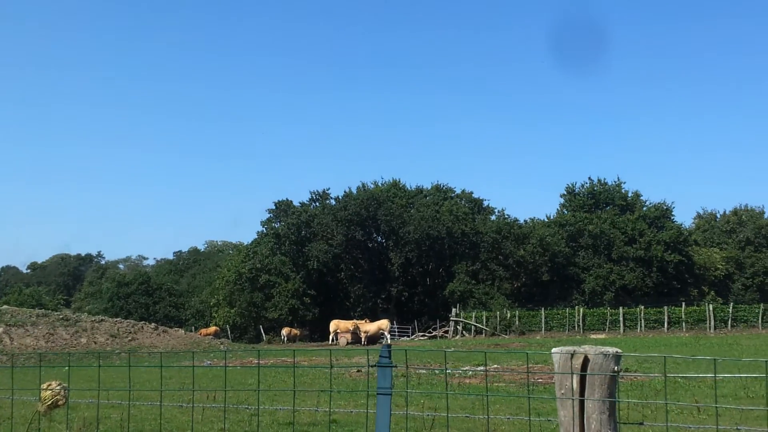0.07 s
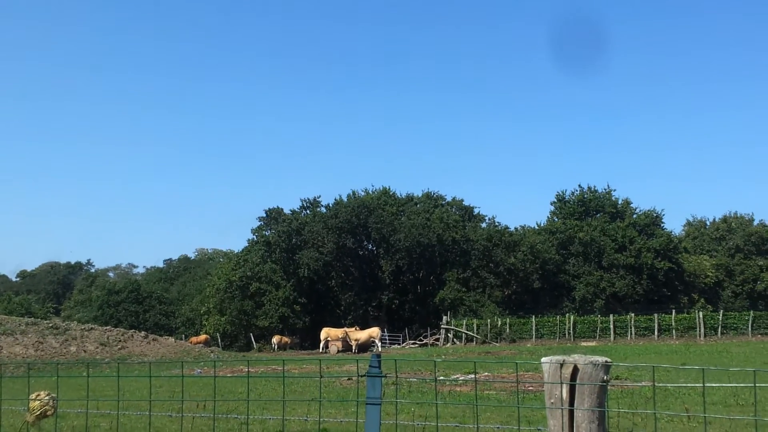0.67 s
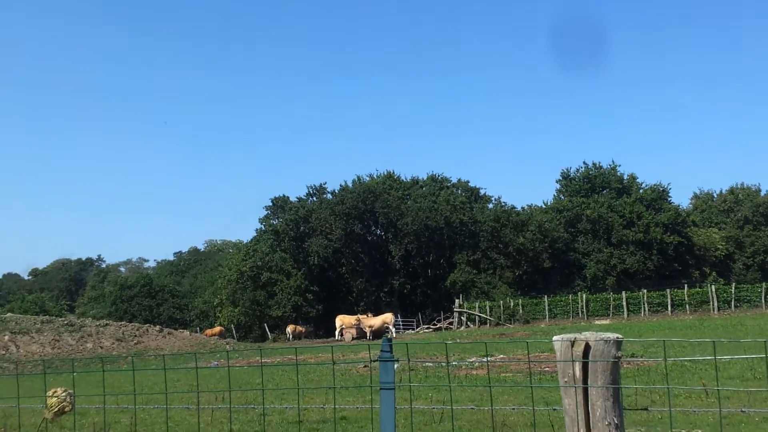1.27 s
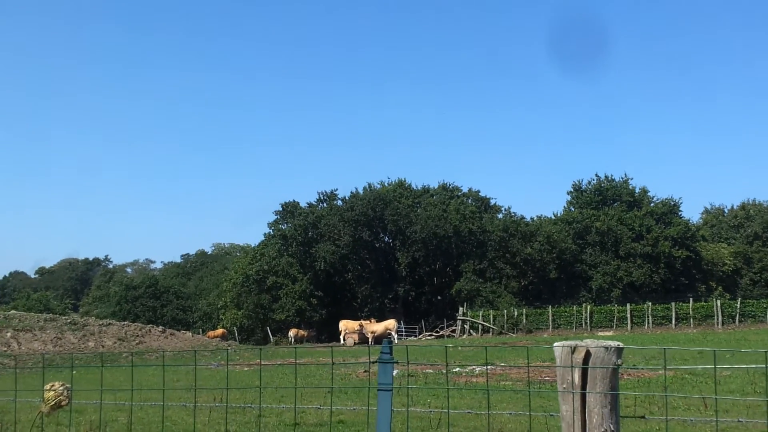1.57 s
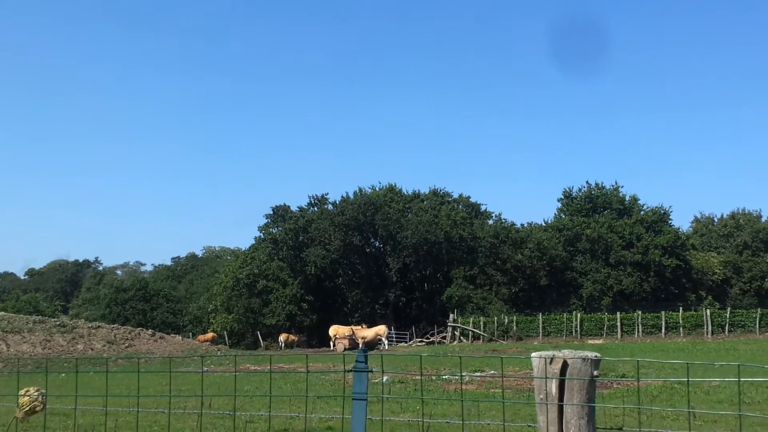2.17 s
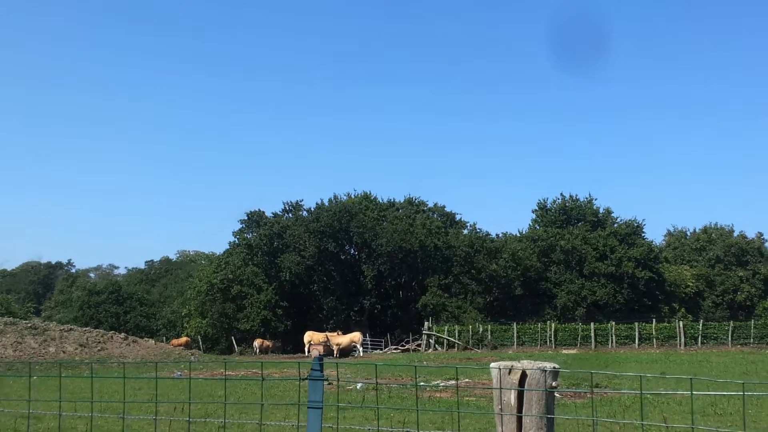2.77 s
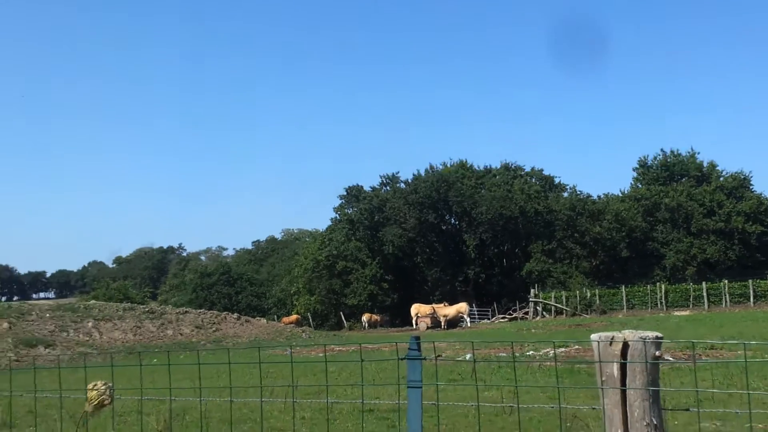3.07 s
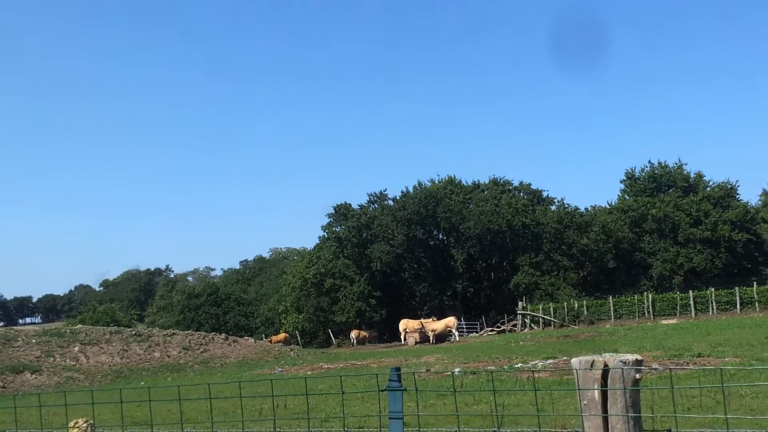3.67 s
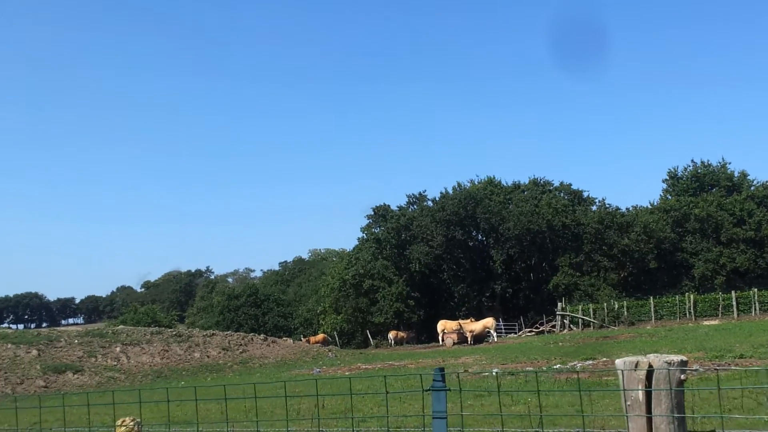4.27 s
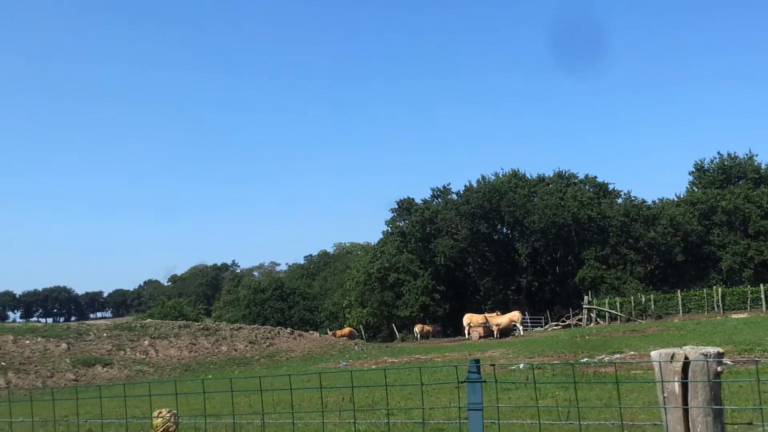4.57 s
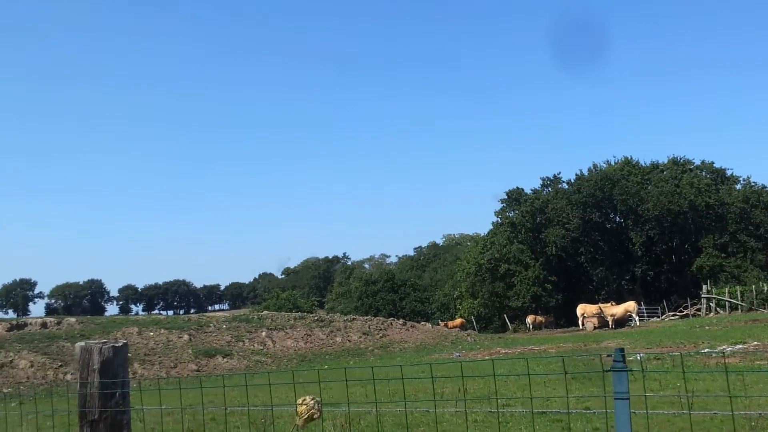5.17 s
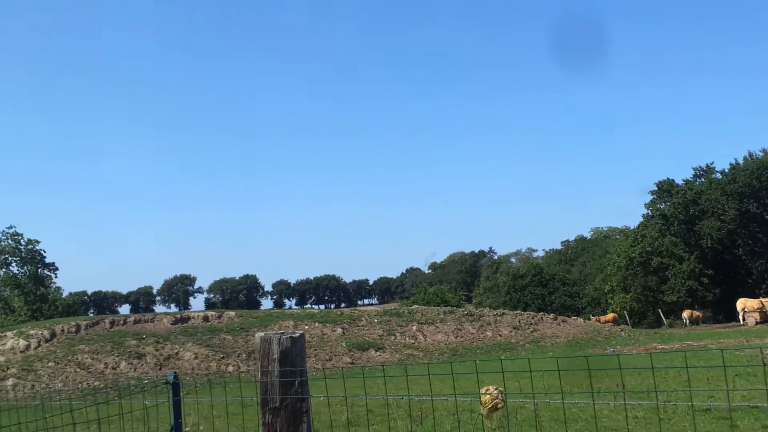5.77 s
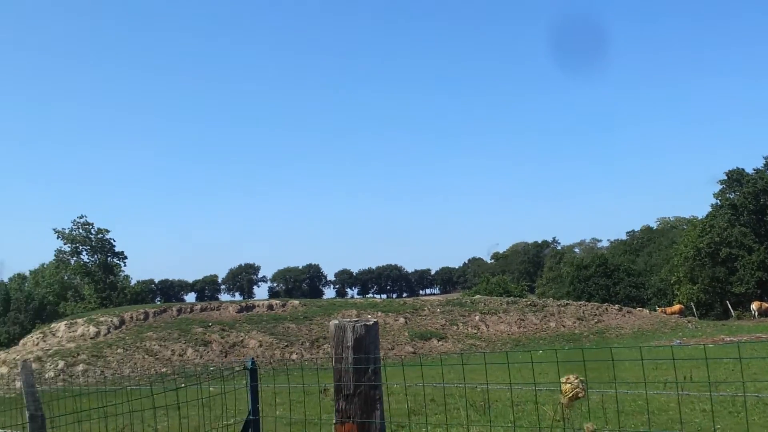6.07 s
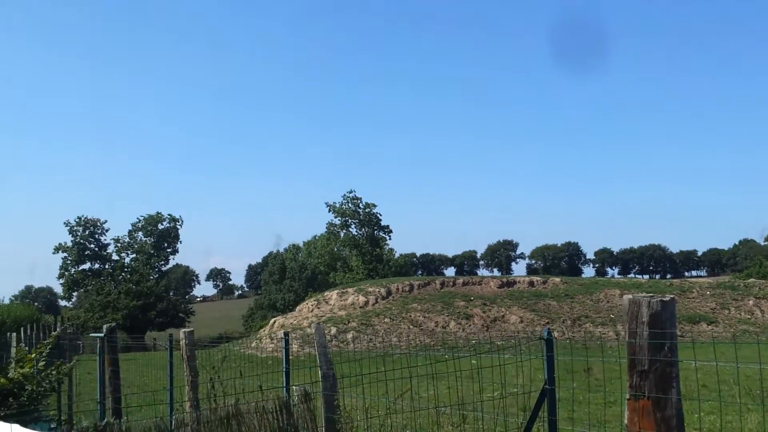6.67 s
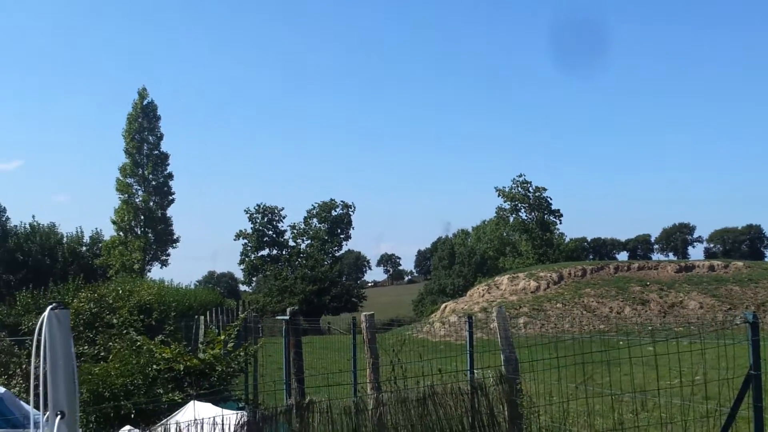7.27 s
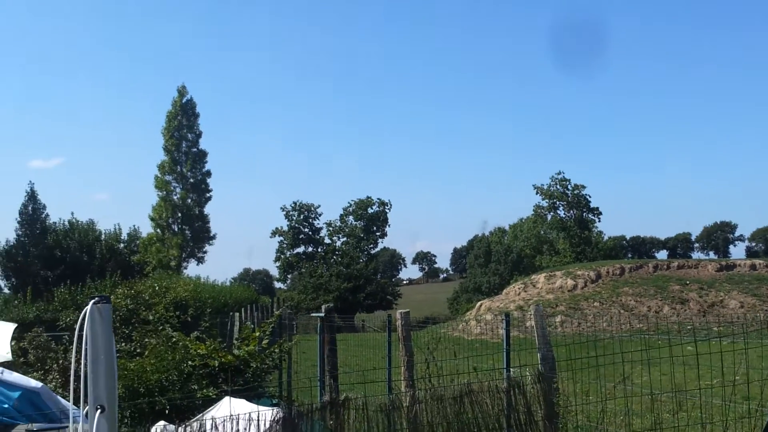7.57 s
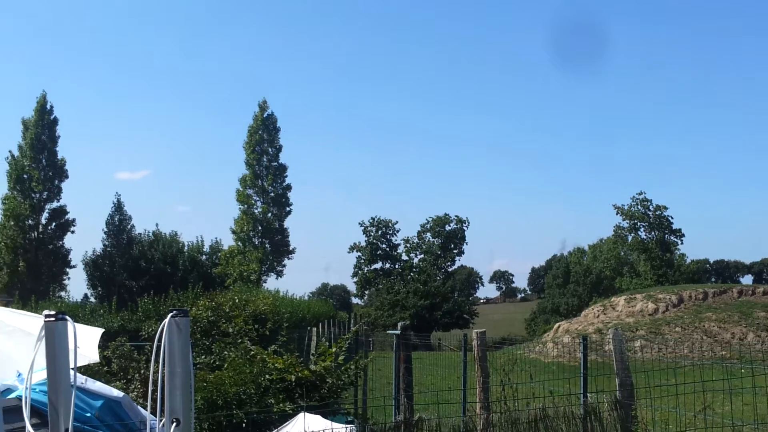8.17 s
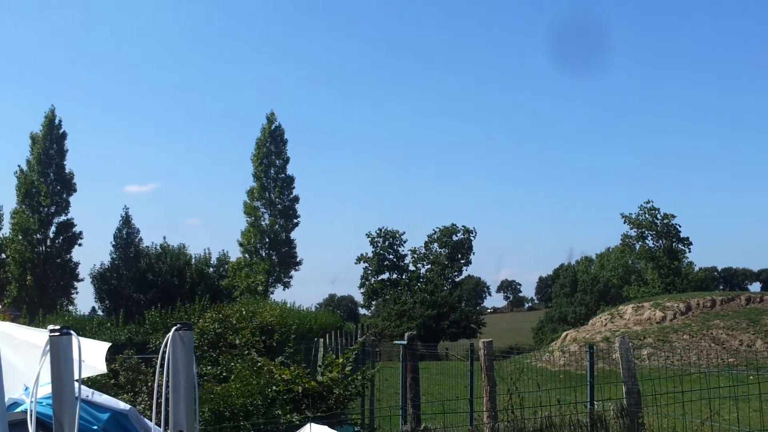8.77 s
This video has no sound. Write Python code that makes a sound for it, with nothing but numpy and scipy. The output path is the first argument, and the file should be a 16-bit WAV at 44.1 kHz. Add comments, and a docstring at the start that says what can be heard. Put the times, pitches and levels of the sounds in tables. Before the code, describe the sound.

Wind hits a hand-held microphone in irregular, rumbling gusts, mainly from the left, while grasshoppers buzz and tick steadily in a field. A very faint bird calls, the first gusts thump, then two sharp plastic double clicks come from the camera. The longest gust follows midway before the wind eases into lighter puffs and the bird calls again. Distant trees hiss softly throughout.

```python
"""Grasshoppers in a gusty pasture

Grasshoppers rasp in the grass, scraping their hind legs on their wings, over the faint rush of
distant trees; a far bird calls twice. Gusts drive eddies across the two microphone ports of a
hand-held camera and buffet mostly the left one. A control on the camera is twice pressed and
released, ringing its plastic body, and a fingertip shifts once."""
import sys
import numpy as np
from scipy import signal
from scipy.fft import rfft, irfft, next_fast_len
from scipy.io import wavfile
from scipy.ndimage import uniform_filter1d

SR = 44100
rng = np.random.default_rng(int(sys.argv[2]) if len(sys.argv) > 2 else 0)


def store_wav(level_fs):
    """Save 16-bit WAV to argv[1]."""
    pcm = np.round(np.clip(np.atleast_2d(level_fs), -1, 1) * 32767)
    wavfile.write(sys.argv[1], SR, pcm.T.astype(np.int16))


N = 393372


def undb(db):
    """Amplitude ratio of a level in decibels."""
    return 10 ** (np.asarray(db) / 20)


def unit(x):
    """Normalisation to an rms of 1."""
    return x / np.sqrt(np.mean(x ** 2))


def curves(table):
    """Linear interpolation of each column over the times in the first."""
    times, *columns = np.transpose(table)
    return [np.interp(np.arange(N) / SR, times, column) for column in columns]


def pan(db):
    """Constant-power gains for a level difference, left minus right."""
    return undb(np.array([[.5], [-.5]]) * db) / np.sqrt((undb(db) + undb(-db)) / 2)


def walk(rate_hz):
    """Smooth random modulation with a standard deviation near 1."""
    hold = int(SR / rate_hz)
    steps = np.repeat(rng.standard_normal(N // hold + 1), hold)
    return 1.36 * uniform_filter1d(uniform_filter1d(steps, hold), hold)[:N]


def noise(colour, channels=2):
    """Uncorrelated noises, shaped to a spectrum of (Hz, dB) points."""
    hz, db = np.transpose(colour)
    size = next_fast_len(N, True)
    gain = undb(np.interp(np.log1p(np.fft.rfftfreq(size, 1 / SR)), np.log(hz), db))
    white = rng.standard_normal((channels, size))
    return unit(irfft(rfft(white) * gain, size)[:, :N])


def add(out, sound, start):
    """Superposition of a short sound from a given sample on, trimmed to the scene."""
    a, b = max(start, 0), min(start + sound.shape[-1], N)
    if b > a:
        out[..., a:b] += sound[..., a - start:b - start]


def far_trees(level_db=-49.0, sway_db=0.23, shared=0.26, pan_db=0.34):
    """Diffuse noise of far trees and microphone hiss: low correlation between the sides makes it wide."""
    # Each row: frequency in Hz, relative level in dB.
    spectrum = [(25, 16), (80, 13.5), (180, 10.5), (400, 9), (650, 6.5), (1000, 5), (1600, 0), (2600, -1),
                (4500, -1.5), (9000, -2), (14500, -8)]
    rush = unit(noise(spectrum) + shared * noise(spectrum, channels=1))
    return rush * undb(level_db + sway_db * walk(2.1)) * pan(pan_db)


def far_bird(attack_s=0.035, fade_s=0.24, blur_hz=45, echo_db=-1, echo_breadth=.15):
    """Random modulation broadens a gliding tone into a hoarse call, blurred by echoes from the trees."""
    # Each row: start in seconds, level in dB, starting pitch in Hz, glide in Hz per second.
    calls = [(.57, -57.5, 2040, -700), (6.94, -55.5, 1387, 600)]
    t, out = np.arange(N) / SR, np.zeros((2, N))
    for start_s, db, hz, glide in calls:
        age = np.maximum(t - start_s, 0)
        pitch_hz = hz + glide * np.minimum(age, fade_s)
        tone = np.sin(2 * np.pi * np.cumsum(pitch_hz) / SR)
        note = np.array([walk(blur_hz) for _ in range(2)]) * np.exp(-age / (fade_s / 2))
        echo = np.array([walk(2 * echo_breadth * hz) for _ in range(2)]) * np.exp(-(age / fade_s) ** 2)
        onset = 1 - np.exp(-age / attack_s)
        out += undb(db) * onset * (note + undb(echo_db) * echo) * tone
    return out


def finger_rub(at_s=4.115, length_s=0.015, level_db=-55, centre_hz=1900):
    """Sliding friction of a fingertip on the camera body gives one brief swell of band noise."""
    t = np.arange(N) / SR
    rub = noise([(centre_hz / 2, -14), (centre_hz, 0), (centre_hz * 2, -22), (SR / 2, -40)])
    return rub * undb(level_db) * np.exp(-((t - at_s) / length_s) ** 2)


def control_clicks(snap_db=-10, snap_s=0.0016, contact_s=.0001, detune=0.012, scatter_db=1.5):
    """Impulse excitation: a small spring snaps, and the damped modes of the plastic body ring."""
    # Press and release, twice. Each row: start in seconds, peak before panning in dB, pan in dB.
    clicks = [(2.7143, -16.5, 11), (2.7493, -20.5, 14), (3.2935, -15, 12), (3.3387, -24.5, 13)]
    # Each row: mode frequency in Hz, relative level in dB, time to decay by 60 dB in seconds.
    body_modes = [(837, -19.5, 0.029), (1060, -12, 0.021), (1490, -22.5, .024), (1820, -17, 0.028),
                  (2370, -17.5, 0.024), (3350, -12.5, 0.015), (4810, -11, 0.0057), (6580, -5.5, 0.0088),
                  (7500, -1.5, 0.0026), (8740, -2.5, 0.0037), (13600, -21, .003)]
    t, out = np.arange(SR // 20) / SR, np.zeros((2, N))
    hz, db, t60 = np.transpose(body_modes)[:, :, None]
    # neighbouring modes swing opposite ways, and each port hears its own share of them
    polarity = (-1) ** np.arange(len(body_modes))[:, None]
    share = polarity * undb(db + scatter_db * rng.standard_normal((2, len(body_modes), 1)))
    decay = np.exp(-np.log(1000) * t / t60)
    for start_s, peak_db, pan_db in clicks:
        tuning = 1 + detune * rng.standard_normal(share.shape)
        ring = (share * decay * np.sin(2 * np.pi * hz * tuning * t)).sum(1)
        snap = undb(snap_db) * np.exp(-t / snap_s) * rng.standard_normal(ring.shape)
        click = (ring + snap) * (1 - np.exp(-t / contact_s))
        add(out, click / np.abs(click).max() * undb(peak_db) * pan(pan_db), int(start_s * SR))
    return out


def wing_rasp(breadth, channels=2):
    """Incoherent powers add: breadth fades from one kind of insect's narrow band to the band of many."""
    # Each row: frequency in Hz, relative level for one kind in dB, for many kinds in dB.
    spectra = [(3000, -35, -30), (4740, -30, -13.5), (5620, -14.5, -7.5), (6500, -6.5, -3.5),
               (7400, 0, -2.5), (8270, -5, -2), (9100, -15, -6.5), (10100, -23, -18), (14200, -24, -19.5)]
    hz, one_db, many_db = np.transpose(spectra)
    one, many = (noise(np.column_stack([hz, db]), channels) for db in (one_db, many_db))
    return np.sqrt(1 - breadth) * one + np.sqrt(breadth) * many


def grasshoppers(level_db=2, flicker_db=0.87, stroke_db=0.5, unsteady=0.013, direct=0.35, rasp_hz=7400):
    """Stridulation: hind legs scrape the wings, and one near insect ticks through the blur of many."""
    # Each row: time in seconds, level in dB, pan in dB, band centre in Hz, breadth from 0 to 1.
    chorus = [(0, -51.5, 2, 7570, .4), (.12, -50, 4.5, 7520, .35), (.25, -53.5, -1, 7300, 0.2),
              (.8, -55.5, 0, 7190, 0.4), (1.37, -49, 1.5, 7255, 0.33), (2.5, -48.5, 1.3, 7545, 0.6),
              (2.85, -53, -0.5, 7470, .6), (3.55, -53, -0.5, 7600, 0.75), (4.1, -51.8, -1.5, 7550, 0.7),
              (4.45, -53, 1, 7400, 0.35), (5.1, -48, 1.5, 7380, .2), (5.6, -47.5, 3.5, 7250, 0.3),
              (6.05, -49.5, 3.5, 7340, .4), (6.61, -48, 1.5, 7490, 0.7), (6.67, -50.5, .5, 7430, .8),
              (7.5, -48, 1, 7100, 0.83), (8.1, -52, 2, 7450, 0.22), (8.92, -50, 4.5, 7580, 0.08)]
    # The near insect. Each row: time in seconds, leg strokes per second, level re the chorus in dB.
    soloist = [(0, 20, -5.5), (1.4, 20.2, -10), (2.9, 13, -8), (4, 21.4, -9), (4.7, 17.3, -12),
               (5.6, 20.2, -6), (6.5, 18.3, -7), (8, 17.7, -17), (8.9, 20.3, -6)]
    # One leg cycle. Each row: place from 0 to 1, width in cycles, relative level in dB.
    scrapes = [(.15, 0.03, 5), (.48, 0.029, -1.5), (.76, 0.026, -10.5)]
    db, pan_db, centre_hz, breadth = curves(chorus)
    stroke_hz, solo_db = curves(soloist)
    cycle = np.cumsum(stroke_hz * (1 + unsteady * walk(5.4))) / SR % 1
    pulses = sum(undb(size) * np.exp(-.5 * ((cycle - at) / width) ** 2) for at, width, size in scrapes)
    pulses *= undb(stroke_db * walk(30))
    near = unit(pulses * (wing_rasp(breadth) + direct * wing_rasp(breadth, channels=1)))
    far = wing_rasp(breadth) * undb(flicker_db * walk(90))
    song = (far + undb(solo_db) * near) / np.sqrt(1 + undb(2 * solo_db))
    # the band slides about its own centre, rasp_hz, as different insects take the lead
    slide = np.exp(2j * np.pi * np.cumsum(centre_hz - rasp_hz) / SR)
    song = np.real(signal.hilbert(song, next_fast_len(N))[:, :N] * slide)
    return song * undb(db + level_db) * pan(pan_db)


def eddy(half_s, angle):
    """Pressure of a passing vortex: a push and a pull, lopsided by the angle at which it meets the port."""
    reach = int(8 * half_s * SR)
    u = np.arange(-reach, reach + 1) / (half_s * SR)
    odd, even = np.tanh(-u), 1 / np.cosh(u) ** 2 - .5
    return 2 * (np.cos(angle) * odd + np.sin(angle) * even) / np.cosh(u)


def port(pressure, leak_hz=40, inlet_hz=620):
    """A port is an acoustic band-pass: slow pressure leaks away, and the small inlet rounds the edges."""
    leaked = signal.sosfilt(signal.butter(2, leak_hz, "high", fs=SR, output="sos"), pressure)
    return signal.sosfilt(signal.butter(2, inlet_hz, fs=SR, output="sos"), leaked)


def wind_level(side, breeze_db=(-47, -53.5), wander_db=2.5, roundness=1.27):
    """Gusts and a wandering breeze add in power; gives the level in dB at port 0 (left) or 1 (right)."""
    # Each row: crest time in seconds, left and right levels in dB, rise and fall in seconds.
    gusts = [(.67, -33, -35, .018, 0.041), (.975, -12, -34, 0.02, 0.074), (1.11, -16.5, -36, 0.062, .1),
             (1.42, -21.5, -39, 0.038, 0.044), (1.7, -44, -50, 0.3, 0.78), (2.68, -27.5, -55, .025, 0.068),
             (3.14, -22, -58, 0.29, 0.13), (4.03, -29.5, -30.5, .1, 0.042), (4.13, -21.5, -48, 0.07, 0.049),
             (4.33, -18, -33, 0.059, 0.052), (4.471, -22, -39, 0.058, 0.11),
             (4.67, -16.5, -39, 0.019, 0.03), (4.75, -18.5, -26, 0.026, .04),
             (4.99, -11.5, -32.5, 0.14, .25), (5.27, -34, -23.5, 0.029, 0.053),
             (5.46, -29, -36, 0.047, 0.053), (5.77, -38, -55, .02, 0.12), (6.15, -46, -34.5, 0.014, 0.059),
             (6.38, -42, -54, 0.16, 0.13), (6.97, -23, -45, 0.048, 0.032), (7.43, -42, -37, 0.094, .08),
             (7.75, -30.5, -41, 0.095, 0.052), (8.16, -36, -33.5, 0.26, 0.41),
             (8.71, -30.5, -53, 0.027, 0.14), (8.9, -24, -31, 0.053, 0.08)]
    t = np.arange(N) / SR
    power = undb(breeze_db[side] + wander_db * walk(24)) ** 2
    for crest_s, *port_db, rise_s, fall_s in gusts:
        away = np.abs(t - crest_s) / np.where(t < crest_s, rise_s, fall_s)
        close = away < 10
        swell = np.exp(-away[close] ** roundness)  # 1 gives a pointed crest, 2 a bell
        power[close] += (undb(port_db[side]) * swell) ** 2
    return 10 * np.log10(power)


def turbulence(db, calm_half_s=0.0041, brisk_db=-30.0, spread=0.51, scatter_db=8, flutter_db=4.0,
               trim_db=-0.57, count=1900):
    """Convected eddies stream over one port; faster air makes them louder and shorter."""
    speed = np.sqrt(undb(db - brisk_db))  # pressure grows with the square of the air speed
    half_s = calm_half_s / np.sqrt(1 + speed ** 2)
    stream = np.zeros(N)
    for k, (jitter, turn, length, size) in enumerate(rng.uniform(-1.033, 1, (count, 4))):
        at = int((k + (jitter + 1) / 2) / count * (N - 1))
        puff = eddy(half_s[at] * np.exp(spread * length), np.pi * turn)
        add(stream, puff * undb(scatter_db * size), at - len(puff) // 2)
    rumble = port(stream * undb(flutter_db * walk(60)))  # clusters with lulls between
    # the wind level alone sets the strength; the eddies give the grain
    power = uniform_filter1d(uniform_filter1d(rumble ** 2, size=2000), size=2000)
    return rumble / np.sqrt(np.abs(power) + 1e-9) * undb(db + trim_db)


def buffets(angle_spread=0.81):
    """A vortex's pressure is local, so each of the hardest eddies thumps mainly one port."""
    # Each row: time in seconds, strength in dB, half length in seconds, pan in dB.
    hard_eddies = [(.953, -9, 0.00089, 33), (1.022, -13, 0.0007, 31), (1.062, -7.5, 0.00076, 37),
                   (1.121, -6, 0.00096, 26), (2.667, -18, 0.0014, 28), (3.095, -14.5, 0.0017, 26),
                   (3.629, -25.5, 0.0033, 27), (3.708, -24.5, 0.0036, 21), (4.031, -16.5, .0012, 16),
                   (4.271, -12, .0016, 19), (4.446, -6.5, 0.0021, 32), (4.784, -9.5, .0013, 28),
                   (4.878, -5.5, 0.0017, 37), (4.953, -5.5, 0.00039, 36), (4.994, -2, 0.0011, 36),
                   (5.009, -5.5, 0.00075, 35), (5.057, -6, 0.001, 30), (5.132, -8, 0.0012, 28),
                   (5.223, -16.5, 0.00055, 25), (5.261, -8.5, 0.0011, -27), (6.831, -21.5, 0.0022, 24),
                   (6.968, -14, 0.0018, 28), (7.764, -12.5, .0016, 31), (8.327, -14.5, 0.0045, 13),
                   (8.705, -17.5, 0.0018, 21)]
    out = np.zeros((2, N))
    for at_s, db, half_s, pan_db in hard_eddies:
        puff = eddy(half_s, angle_spread * rng.standard_normal())
        add(out, puff * undb(db) * pan(pan_db) / np.sqrt(2), int(at_s * SR) - len(puff) // 2)
    return port(out)


def scene():
    """Superposition of the pasture's sounds with wind and handling at the camera."""
    wind = np.array([turbulence(wind_level(side)) for side in range(2)]) + buffets()
    return wind + grasshoppers() + far_trees() + far_bird() + control_clicks() + finger_rub()


def record(dry, top_hz=14600):
    """Band limiting: the camera's steep low-pass cuts the top of the treble."""
    return signal.sosfilt(signal.ellip(10, .1, 80, top_hz, fs=SR, output="sos"), dry)


dry = scene()
out = record(dry)
store_wav(out)
```